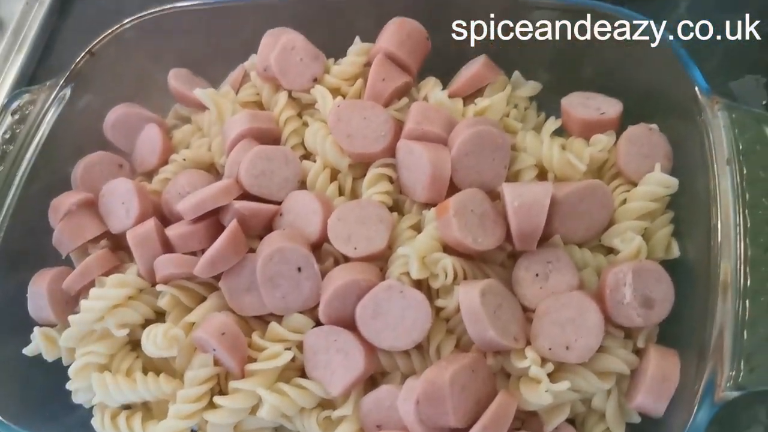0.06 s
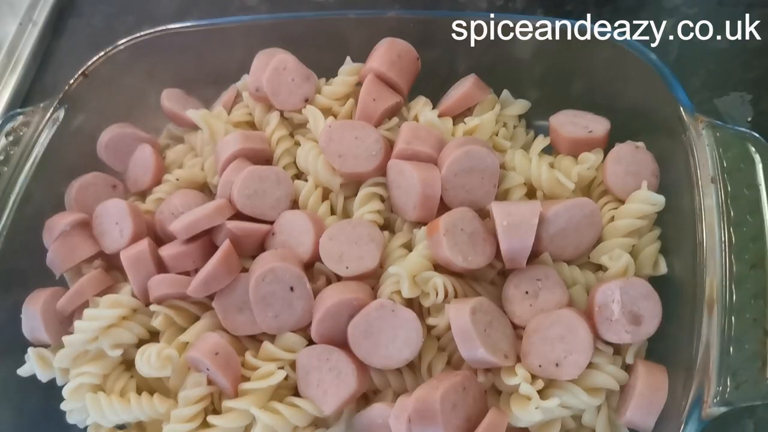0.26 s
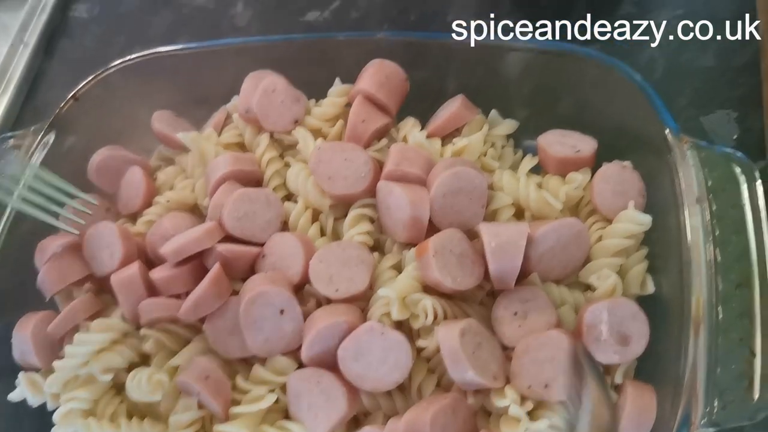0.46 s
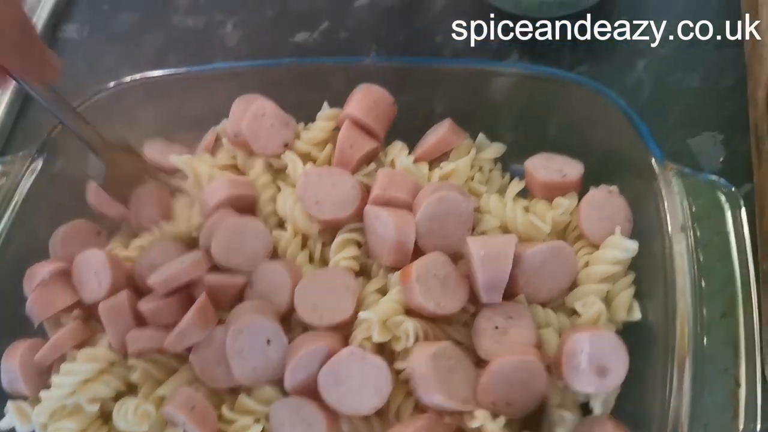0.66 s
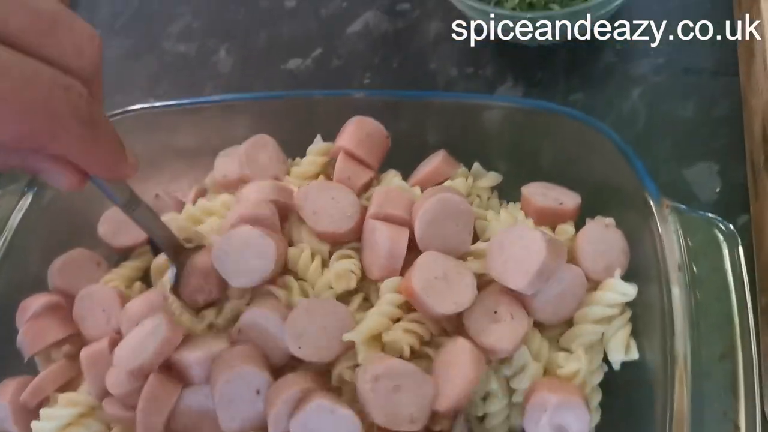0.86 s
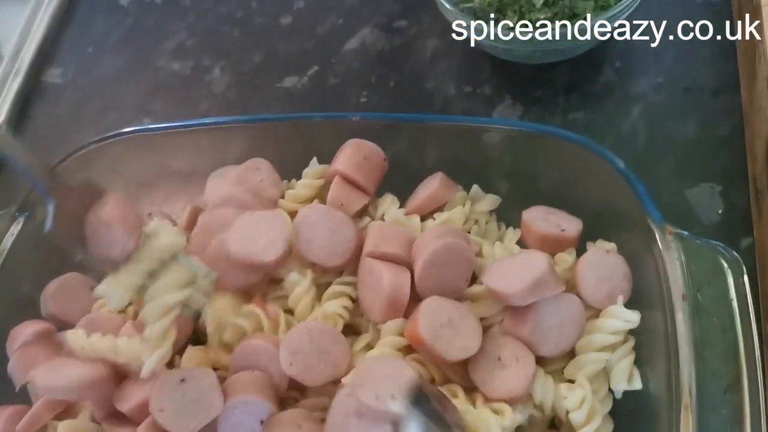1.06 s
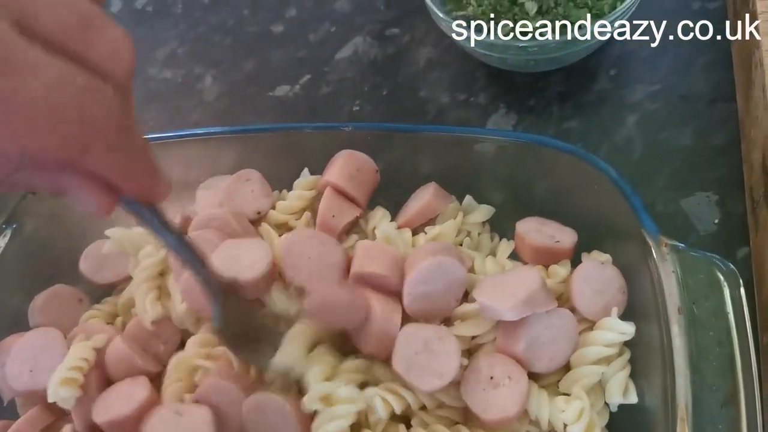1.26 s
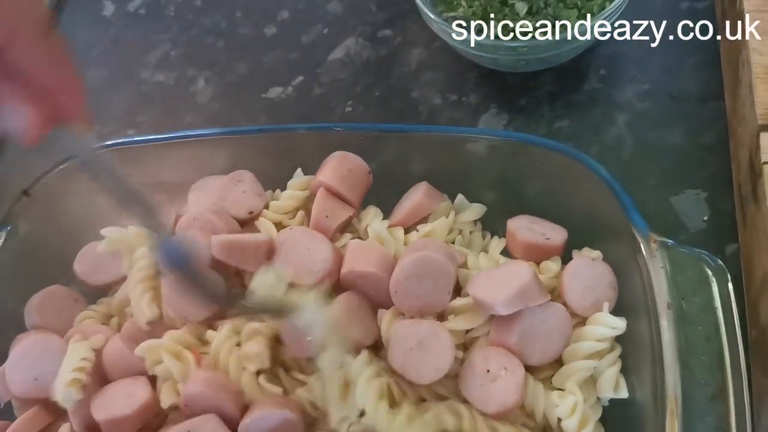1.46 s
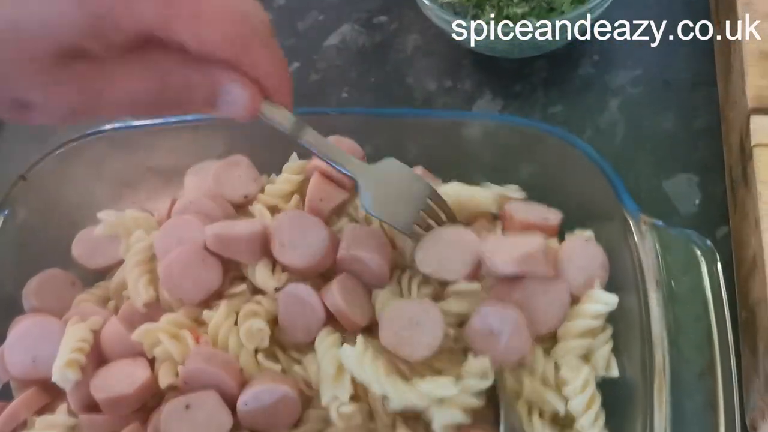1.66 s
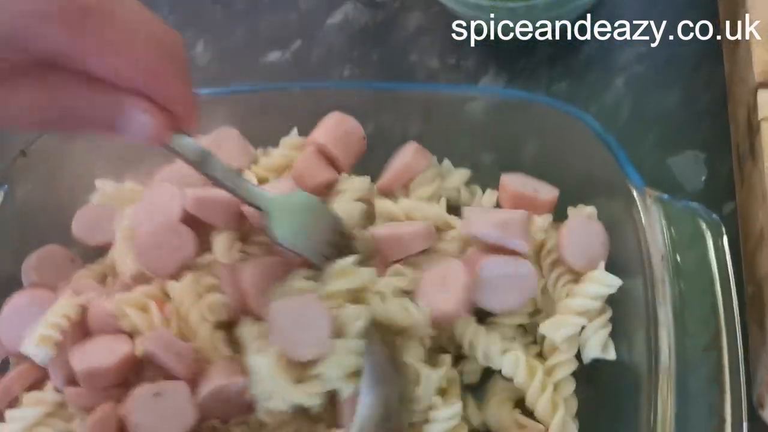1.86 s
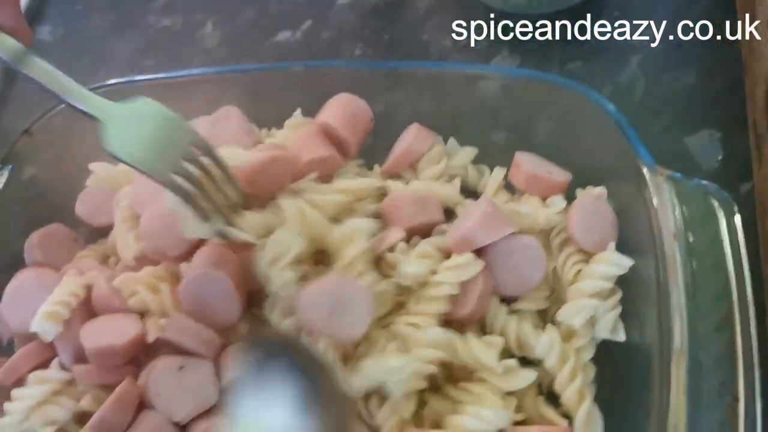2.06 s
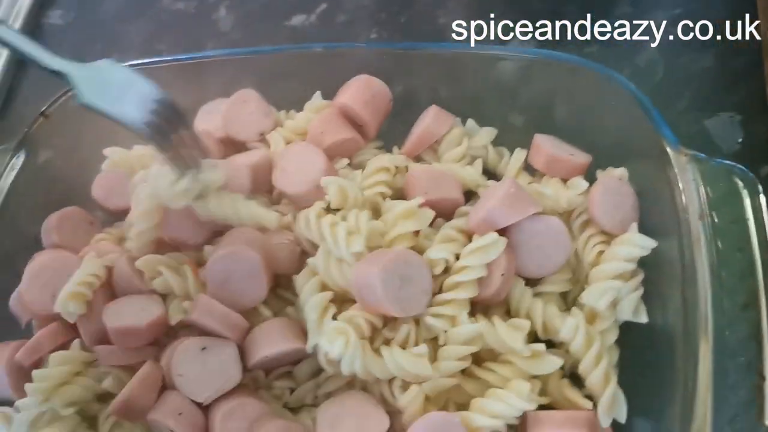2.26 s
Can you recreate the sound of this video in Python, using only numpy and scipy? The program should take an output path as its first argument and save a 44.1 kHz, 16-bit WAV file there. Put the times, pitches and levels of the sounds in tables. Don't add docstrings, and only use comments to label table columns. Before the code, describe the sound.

A wooden cutlery drawer rumbles shut and slams, its contents hissing as they settle; then fork and spoon clash, moist pasta rustles faintly, and a fork knocks a glass dish, close in a small hard kitchen.

```python
import sys
import numpy as np
from scipy import signal
from scipy.fft import rfft, irfft
from scipy.io import wavfile
from scipy.ndimage import uniform_filter1d

SR = 44100
rng = np.random.default_rng(int(sys.argv[2]) if len(sys.argv) > 2 else 0)


def file_out(sig):
    cols = np.atleast_2d(sig).T
    lim = np.clip(cols, -1, 1)
    pcm = np.round(lim * 32767).astype(np.int16)
    wavfile.write(sys.argv[1], SR, pcm)


def gain_from_decibels(decibels):
    exponent = np.asarray(decibels, float) / 20
    return 10 ** exponent


N = 101429


def level(x, db):
    return x * gain_from_decibels(db) / np.sqrt(np.mean(x ** 2))


def read(table, hz):
    table_hz, values = np.array(table)[:, :2].T
    return np.interp(np.log(np.maximum(hz, 1)), np.log(table_hz), values)


def curve(table, t):
    return gain_from_decibels(np.interp(t, *np.array(table).T, left=-200, right=-200))


def colour(x, table):
    log_gain = read(table, np.arange(4097) * SR / 8192) * np.log(10) / 20
    cepstrum = irfft(log_gain)
    cepstrum[1:4096] *= 2
    cepstrum[4097:] = 0
    response = irfft(np.exp(rfft(cepstrum)))
    return signal.fftconvolve(x, response)[:len(x)]


def band(x, hz, width):
    return signal.lfilter(*signal.iirpeak(min(hz, 0.45 * SR), hz / width, fs=SR), x)


def ring(x, hz, t60):
    pole = np.exp(2j * np.pi * hz / SR - np.log(1000) / (t60 * SR))
    return signal.lfilter([1, 0, -1], [1, -2 * pole.real, abs(pole) ** 2], x) / 2


def noise():
    return rng.standard_normal(N)


def walk(rate):
    k = int(SR / rate)
    steps = np.repeat(rng.standard_normal(N // k + 1), k)
    return 2.2 * uniform_filter1d(uniform_filter1d(steps, k), k)[:N]


def sweep(hz):
    return np.sin(2 * np.pi * np.cumsum(hz) / SR)


def alike(a, b):
    side = signal.lfilter(*signal.butter(1, 490, "high", fs=SR), b)
    return np.array([a + side, a - side]) / np.sqrt(2)


def struck(t, blows, modes, crack):
    press_s = 0.0006
    shiver_db, shiver_times = -15, 3.3
    out = np.zeros(N)
    u = t[:SR // 2]
    for start_s, ring_db, crack_db, contact_s, rattle_s in blows:
        strength, chance, hiss = rng.standard_normal((3, len(u)))
        taps = 0.5 * np.exp(-u / rattle_s) * strength * (chance > 1.9)
        taps[int(press_s * SR)] = 1
        soft = np.exp(-1 / (contact_s * SR))
        push = signal.lfilter([(1 - soft) ** 2], [1, -2 * soft, soft ** 2], taps)
        fade = np.exp(-u / rattle_s) + gain_from_decibels(shiver_db) * np.exp(-u / rattle_s / shiver_times)
        fade = fade * (1 - np.exp(-u / press_s))
        blow = gain_from_decibels(crack_db) * colour(hiss * fade, crack)
        for hz, db, t60 in modes:
            spot_db, side = rng.standard_normal(2)
            blow += np.sign(side) * gain_from_decibels(ring_db + db + spot_db) * ring(push, hz, t60)
        first = int(start_s * SR)
        out[first:][:len(u)] += blow[:N - first]
    return out


# (time [s], level [dB])
ROLL = [
    (0, -32),
    (.03, -44.5),
    (.078, -33.5),
    (.12, -39.5),
    (.17, -40.5),
    (.2, -44.5),
    (.228, -48.5),
]
# (frequency [Hz], width [Hz], level [dB])
ROLL_BODY = [(44, 11, -11), (124, 33, -7), (155.6, 11, -7), (244, 40, -4.5), (453, 99, -29.5),
             (637.3, 41, -29.5), (806, 78, -32)]
# (start [s], end [s], first pitch [Hz], last pitch [Hz], level [dB])
RUNNER_SQUEAKS = [
    (0, 0.069, 12900, 13880, -80.5),
    (.14, 0.219, 12510, 12900, -93),
]


def rolling_drawer(t):
    bumps = noise()
    body = sum(gain_from_decibels(db) * band(band(bumps, hz, width), hz, width) / np.sqrt(width)
               for hz, width, db in ROLL_BODY)
    rumble = level(body, 0)[::-1]
    hiss = gain_from_decibels(-31.5 + 2 * walk(70)) * noise()
    out = curve(ROLL, t) * (rumble + hiss)
    out += level(band(noise(), 5770, 40), -72) * (t < SLAMS[0][0])
    for start, end, first_hz, last_hz, db in RUNNER_SQUEAKS:
        glide = np.interp(t, [start, end], [first_hz, last_hz])
        out += gain_from_decibels(db) * sweep(glide) * (t >= start) * (t < end)
    return out


# (frequency [Hz], level per Hz [dB])
KITCHEN = [(25, 2.5), (100, -6.5), (250, -16.5), (700, -20), (1200, -29.5), (3000, -36), (7000, -44.5),
           (16000, -45.5)]
# (frequency [Hz], width [Hz], level [dB])
HUM = [(198, 20, -68.5), (226, 9, -75), (352, 9, -78.5), (133, 10, -72)]


def kitchen():
    air = level(alike(colour(noise(), KITCHEN), colour(noise(), KITCHEN)), -60.5) * gain_from_decibels(walk(3))
    whine = gain_from_decibels(-72 + 1.2 * walk(24)) * sweep(748 * (1 + 0.004 * walk(5.4)))
    hum = sum(level(band(noise(), hz, width), db) for hz, width, db in HUM)
    return air + whine + hum


# (time [s], ring level [dB], crack level [dB], contact [s], rattle length [s])
SLAMS = [
    (0.2259, -23, -23.5, 0.0001, 0.0013),
    (0.2335, -20, -17, 0.000025, 0.0021),
    (0.2352, -18, -14.5, 0.000019, 0.0025),
    (.2368, -21, -12.5, 0.00003, 0.0038),
    (0.245, -25, -24, 0.0002, .014),
]
# (time [s], ring level [dB], crack level [dB], contact [s], rattle length [s])
BOOMS = [
    (0.238, -19, -68, 0.001, 0.0045),
    (0.252, -15.5, -76.5, 0.00056, 0.003),
    (0.265, -13, -73, .0012, 0.0012),
    (0.29, -21.5, -73.5, 0.00088, 0.0029),
    (.34, -27, -71, 0.0013, 0.0027),
    (0.396, -19.5, -72.5, 0.0024, 0.002),
    (0.446, -28, -70.5, 0.0028, 0.002),
    (0.489, -30, -72.5, 0.0023, 0.0034),
    (.535, -35.5, -72.5, 0.0041, 0.0028),
]
# (frequency [Hz], level [dB], fade by 60 dB [s])
DRAWER_FRONT = [(284, -3.5, 0.05), (360.4, -8.5, 0.024), (426, -7, 0.06), (538, -9.5, 0.012),
                (653, -6, 0.038), (747.5, -9, 0.096), (883, -10, .05), (1090, -14.5, 0.027),
                (1326, -11, .04), (1590, -11, 0.058), (2038, -6.5, 0.056), (2475, -3, 0.014),
                (2840, -12.5, 0.015), (4288, -10.5, 0.02)]
# (frequency [Hz], level [dB], fade by 60 dB [s])
CABINET = [(50, -20.5, 0.61), (91.8, -6.5, 0.29), (126, -2, 0.08), (154, -1.5, 0.13), (191.9, -10.5, 0.18),
           (243, -8.5, 0.075)]
# (frequency [Hz], level [dB])
WOOD_CRACK = [(150, -17), (300, 0.5), (600, 11), (2500, -1), (4500, -9), (6500, -7.5), (8500, -30),
              (16000, -40.5)]


def slam(t):
    return struck(t, SLAMS, DRAWER_FRONT, WOOD_CRACK) + struck(t, BOOMS, CABINET, WOOD_CRACK)


# (time [s], level [dB])
SLIDE = [
    (0.226, -53.5),
    (0.238, -44),
    (0.298, -34),
    (0.534, -78),
    (0.55, -74.5),
]


def sliding_contents(t):
    grains = noise() * gain_from_decibels(walk(330))
    return curve(SLIDE, t) * level(band(grains, 10000, 21000), -4)


# (time [s], ring level [dB], crack level [dB], contact [s], rattle length [s])
CLASHES = [
    (0.63, -11, -15.5, 0.000031, 0.0032),
    (.636, -25, -16, 0.000012, 0.0072),
    (0.647, -28, -28, 0.000027, 0.0025),
]
# (time [s], ring level [dB], crack level [dB], contact [s], rattle length [s])
CLINKS = [
    (0.7343, -50.5, -17, 0.000011, 0.0022),
    (.7412, -33.5, -26, 0.0000049, 0.0041),
]
# (frequency [Hz], level [dB], fade by 60 dB [s])
CUTLERY = [(470, -8.5, 0.015), (767, -16, 0.077), (1334, -12.5, 0.043), (1563, -11.5, 0.13),
           (2261, -20, 0.23), (2365, -12, 0.12), (2800, -17, 0.14), (3370, -21.5, 0.18), (4630, -25.5, .3),
           (4882, -25, .15), (5250, -30, 0.38), (5800, -22.5, .12), (7160, -13.5, 0.073),
           (8662, -17.5, .12), (9200, -12, 0.1), (9800, -16.5, .07), (10520, -13.5, .035),
         (11500, -12.5, 0.15)]
# (frequency [Hz], level [dB])
STEEL_CRACK = [(250, -37.5), (500, -3.5), (1500, -3), (3000, -4), (6000, -8), (10000, -5.5), (16000, -12)]
# (frequency [Hz], level [dB])
TIP_CRACK = [(500, -40), (3000, -5), (7000, -17.5), (9500, -0.5), (13000, -7.5), (16000, -6.5)]


def clashing_cutlery(t):
    steel = CUTLERY
    return struck(t, CLASHES, steel, STEEL_CRACK) + struck(t, CLINKS, steel, TIP_CRACK)


def handle_thud(t):
    start_s, hz, db, t60 = 0.735, 155, -40, 0.22
    u = t - start_s
    fade = gain_from_decibels(-60 * abs(u) / t60) * np.clip(u / 0.006, 0, 1)
    return gain_from_decibels(db) * np.sin(2 * np.pi * hz * u) * fade


# (time [s], level [dB])
STIR = [
    (.85, -70),
    (1.15, -78.5),
    (1.2, -90),
    (1.27, -75),
    (1.55, -92),
    (1.68, -79),
    (1.71, -74),
    (1.8, -70.5),
    (2.1, -79.5),
]
# (time [s], peak level [dB], frequency
# [Hz])
TICKS = [(0.9343, -46, 9920), (0.9658, -49, 11090), (1.0161, -64, 11100), (1.0385, -55, 8800),
         (1.0468, -55.5, 9110), (1.276, -60, 10640), (1.348, -58, 10000), (1.3962, -53.5, 8660),
         (1.6877, -55, 10500), (1.6972, -58, 10070), (1.7074, -59, 10660),
         (1.870, -53, 10800),
    (1.892, -53, 13000),
    (1.963, -62, 12000),
    (1.689, -47, 15300),
]


def food(t):
    width_hz, tick_db = 3300, 2
    out = curve(STIR, t) * gain_from_decibels(1.8 * walk(130)) * band(noise(), 10600, 6140)
    for start_s, db, hz in TICKS:
        tick = noise() * (t >= start_s) * np.exp(-np.maximum(t - start_s, 0) / 0.0012)
        out += gain_from_decibels(db + tick_db) * band(band(tick, hz, width_hz), hz, width_hz)
    return out


# (time [s], ring level [dB], crack level [dB], contact [s], rattle length [s])
KNOCKS = [
    (1.8053, -24, -28.5, 0.000021, 0.0036),
]
# (time [s], ring level [dB], crack level [dB], contact [s], rattle length [s])
TAPS = [
    (1.9288, -44.5, -51, 0.000062, .001),
]
# (frequency [Hz], level [dB], fade by 60 dB [s])
DISH = [(280, -12, 0.021), (466, -20, 0.063), (800, -13.5, 0.045), (1395, -17, 0.085), (2430, -4.5, 0.029),
        (2550, -10, 0.024), (3350, -8, 0.06), (3980, -2, 0.013), (4830, 5, 0.014), (5400, -11.5, 0.036),
        (5880, 3, 0.028), (9010, -8.5, 0.034)]
# (frequency [Hz], level [dB], fade by 60 dB [s])
DISH_EDGE = [(2390, 12.3, 0.033), (2796, 8.9, 0.042), (3320, 1.1, 0.024), (3670, 2.2, 0.039)]
# (frequency [Hz], level [dB])
GLASS_CRACK = [(150, -50.5), (450, -22), (1100, -34), (2800, 3.5), (4500, -6), (9500, 2.5), (12000, -28),
               (16000, -61)]


def knocked_dish(t):
    return struck(t, KNOCKS, DISH, GLASS_CRACK) + struck(t, TAPS, DISH_EDGE, GLASS_CRACK)


def squeak(t):
    start_s, rise_s, fall_s, ring_s = 1.843, 0.012, 0.0049, 0.056
    u = np.maximum(t - start_s, 0)
    rise = np.sin(np.pi / 2 * u / rise_s) ** 2
    skid = np.where(u < rise_s, rise, np.exp(-(u - rise_s) / fall_s))
    after = 0.12 * (u > 0) * gain_from_decibels(-60 * u / ring_s + 3.9 * walk(86)) * (1 - np.exp(-u / rise_s))
    phase = 2 * np.pi * np.cumsum(4392 * (1 + 0.0036 * walk(50))) / SR
    partials_db = (-21.5, -32.5, -72)
    tone = sum(gain_from_decibels(db) * np.sin((k + 1) * phase) for k, db in enumerate(partials_db))
    return (skid + after) * tone


# (frequency [Hz], fade by 60 dB [s])
ROOM_T60 = [(60, 0.45), (300, 0.41), (2000, 0.41), (8000, 0.3), (16000, 0.082)]


def room(x):
    t = np.arange(SR // 2) / SR
    tails = []
    for _ in range(2):
        tail = sum(band(rng.standard_normal(len(t)), hz, 0.83 * hz) * gain_from_decibels(-60 * t / read(ROOM_T60, hz))
                   for hz in 60 * 2 ** np.arange(9))
        tails.append(tail * np.minimum(t / 0.0049, 1))
    echoes = alike(*tails)
    echoes = echoes / np.sqrt(np.sum(echoes[0] ** 2))
    return signal.fftconvolve(x[None], echoes, axes=1)[:, :N]


def scene():
    t = np.arange(N) / SR
    cutlery = clashing_cutlery(t) + handle_thud(t)
    dish = knocked_dish(t) + squeak(t) + food(t)
    drawer = rolling_drawer(t) + sliding_contents(t) + slam(t)
    sources = drawer, cutlery, dish
    right_leads = (4, 36, -3)
    echo_db = (-5.5, -6.5, -12.5)
    direct = sum(np.array([np.roll(x, lead), x]) for x, lead in zip(sources, right_leads))
    into_room = sum(gain_from_decibels(db) * x for x, db in zip(sources, echo_db))
    return direct + room(into_room) + kitchen()


# (frequency [Hz], level [dB])
MIC_LEFT = [(60, 3), (700, 4.5), (2500, 7), (5000, 4.5), (7300, -2.5), (8700, 13), (11500, 15),
            (15500, 3.5)]
# (frequency [Hz], level [dB])
MIC_RIGHT = [(60, 1), (300, 0), (700, -3.5), (2500, 3), (5000, 0.5), (7500, 2), (9000, -26), (15500, -10.5)]


def microphones(dry):
    lead_in = 4096
    dry = np.pad(dry, ((0, 0), (lead_in, 0)), "reflect")
    ports = np.array([colour(dry[0], MIC_LEFT), colour(dry[1], MIC_RIGHT)])
    ports = signal.sosfilt(signal.butter(2, 45, "high", fs=SR, output="sos"), ports)
    ports = signal.sosfilt(signal.ellip(8, 0.5, 45, 15900, fs=SR, output="sos"), ports)
    return ports[:, lead_in:]


def roll_off(x):
    return signal.sosfilt(signal.butter(12, 16700, fs=SR, output="sos"), x)


def record(dry):
    mix = microphones(dry)
    return roll_off(mix)


dry = scene()
out = record(dry)
file_out(out)
```